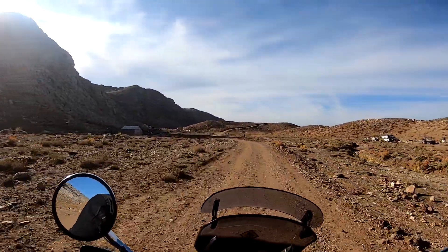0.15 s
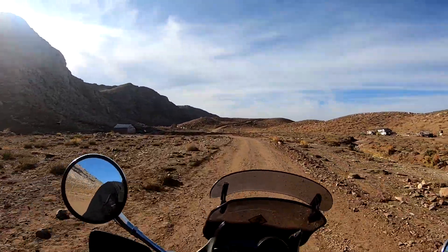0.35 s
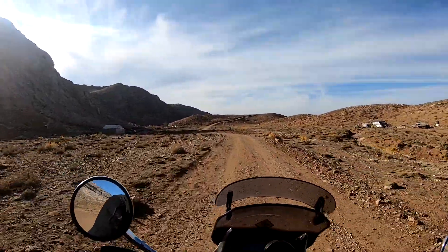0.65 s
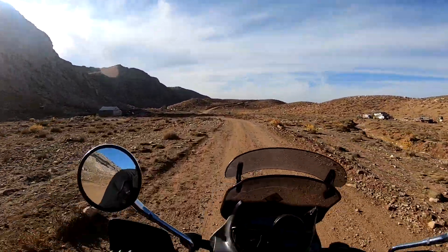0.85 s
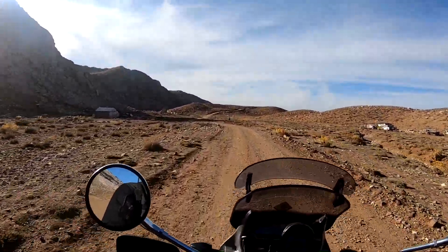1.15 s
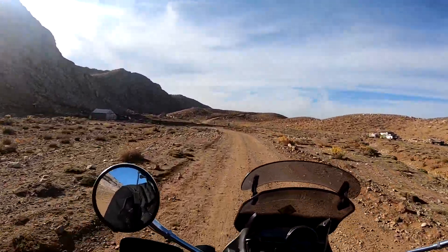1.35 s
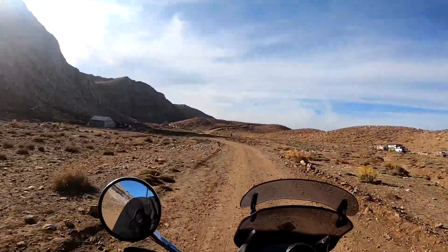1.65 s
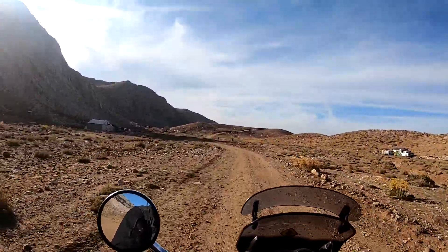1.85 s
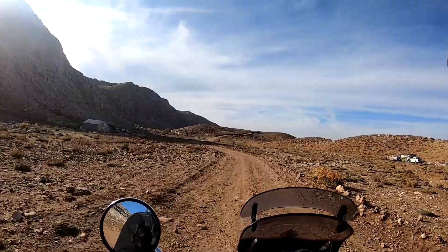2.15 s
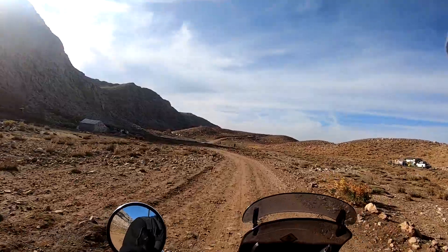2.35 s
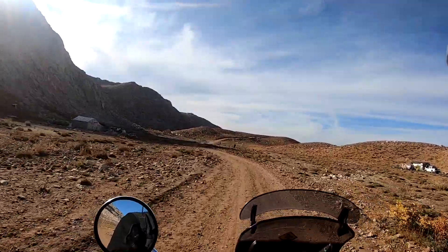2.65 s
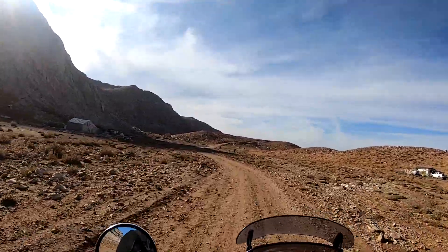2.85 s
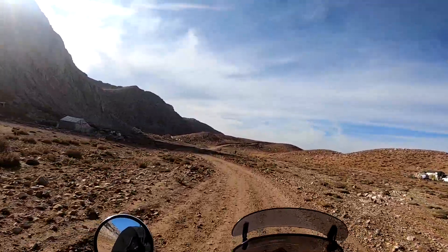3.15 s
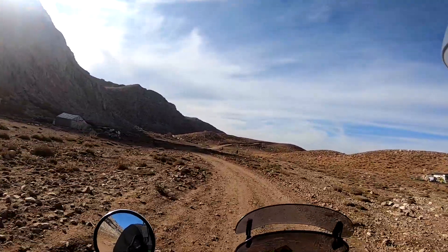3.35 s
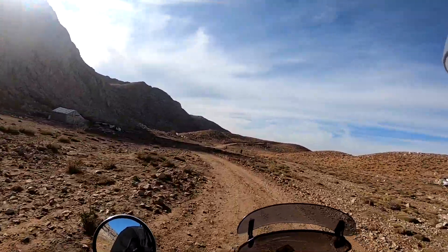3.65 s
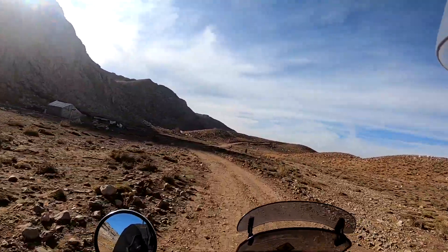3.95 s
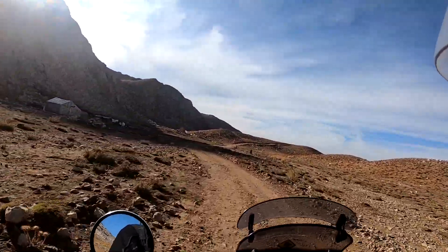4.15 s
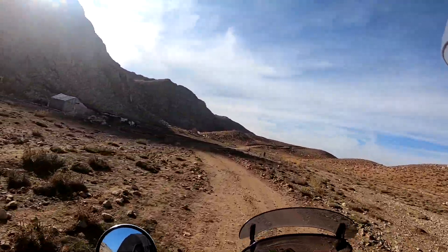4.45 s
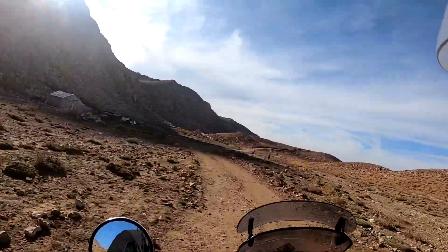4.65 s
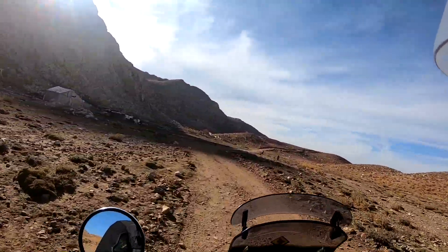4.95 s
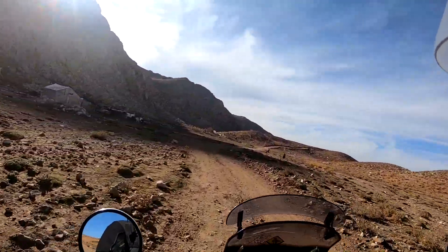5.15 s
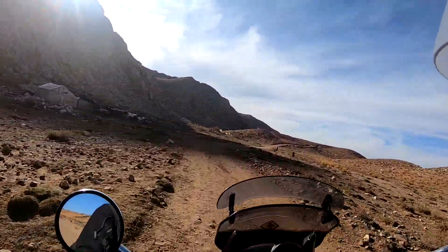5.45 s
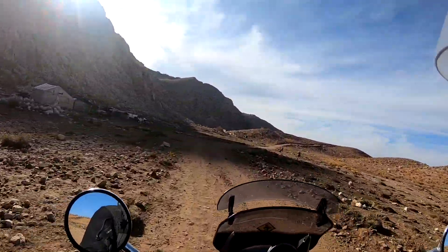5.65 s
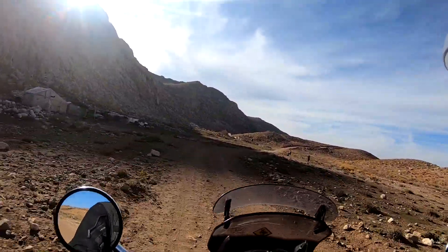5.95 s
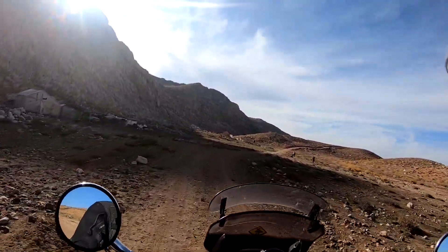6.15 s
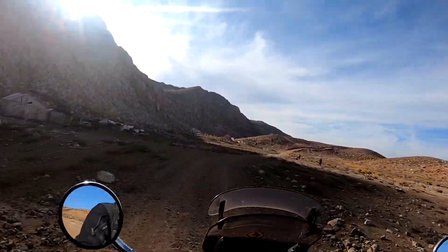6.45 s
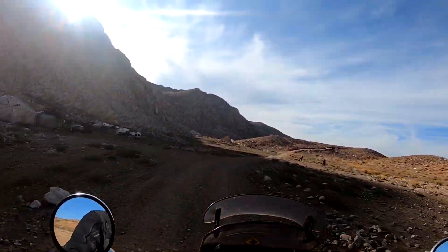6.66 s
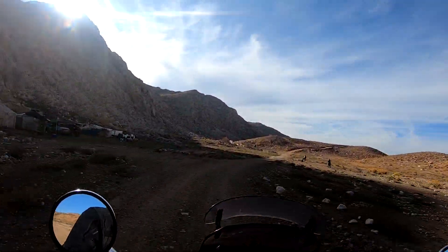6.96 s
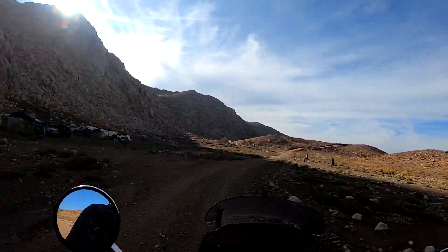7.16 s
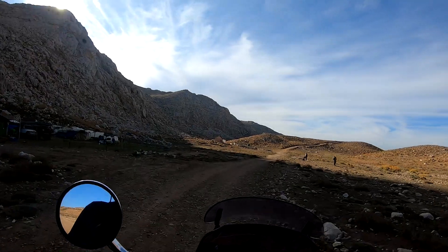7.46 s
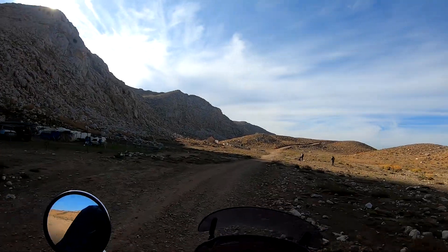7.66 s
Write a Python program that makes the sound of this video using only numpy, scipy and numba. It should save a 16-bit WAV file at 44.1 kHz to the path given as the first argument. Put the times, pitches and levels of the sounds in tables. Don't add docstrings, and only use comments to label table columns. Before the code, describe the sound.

A motorcycle drones low over a stony track, wind buffeting the microphone while knocks, clacks, rattles and gravel crackle come in irregular bursts.

```python
import sys
import numpy as np
from scipy import signal
from scipy.fft import rfft, irfft
from scipy.io import wavfile
from scipy.ndimage import uniform_filter1d
from numba import njit

SR = 44100
rng = np.random.default_rng(int(sys.argv[2]) if len(sys.argv) > 2 else 0)


def undo_db(level):
    steps = np.asarray(level, float) / 20
    return 10 ** steps


def dump_mix(stems):
    frames = np.atleast_2d(stems).T
    limited = np.clip(frames, -1, 1)
    pcm = np.round(limited * 32767).astype(np.int16)
    wavfile.write(sys.argv[1], SR, pcm)


N = 344421

# start in seconds, click in dB, thud in dB, upper click in dB.
THUMPS = [(0.065, -27, -22, -54), (0.2942, -27.5, -22.5, -44.5), (0.985, -41, -37, -39),
          (1.044, -21, -23, -36), (1.0957, -22, -24, -47.5), (1.145, -21.5, -25, -37),
          (1.3053, -26.5, -14.5, -61), (1.5133, -21.5, -20.5, -33), (1.6216, -22.5, -27, -47),
          (2.1257, -22, -27, -41), (2.252, -21, -20, -35), (2.9267, -10.5, -13, -39),
          (3.177, -23.5, -25, -38), (3.3006, -22.5, -18.5, -34), (3.8698, -24, -27, -45),
          (4.0314, -12, -25, -31.5), (4.1047, -25, -25, -32), (4.2657, -19.5, -30, -33.5),
          (4.5414, -12, -19, -35), (4.758, -25, -23.5, -50), (5.2848, -27, -13.5, -26),
          (5.367, -16, -27, -40), (5.6205, -20.5, -23, -49), (5.6936, -10, -10.5, -34),
          (5.8329, -12.5, -21.5, -38), (6.2897, -20, -27, -42), (6.7452, -13.5, -16, -24),
          (7.4332, -21.5, -40, -49), (7.5694, -17.5, -15.5, -43), (7.713, -17, -24.5, -44)]
CLACKS = [(1.1718, -26, -39, -59), (1.2896, -29, -38, -57), (1.5604, -17.5, -23, -45),
          (1.6604, -11.5, -16, -24.5), (1.7748, -12.5, -17.5, -28.5), (2.0742, -14, -18, -34),
          (2.601, -18, -25, -34.5), (3.106, -25.5, -42, -40.5), (3.308, -9, -30, -34),
          (3.501, -12.5, -16.5, -30), (3.5969, -14.5, -14, -22.5), (4.1492, -16.5, -20, -32),
          (4.4092, -15, -22, -39), (4.4662, -20, -23, -31), (4.6051, -20.5, -18.5, -34),
          (4.8196, -13.5, -25, -25), (4.8897, -18.5, -23, -46), (5.016, -11, -13, -26.5),
          (5.1222, -13.5, -19, -26.5), (5.2352, -8, -12, -21), (5.44, -10, -16, -21.5),
          (5.4983, -12.5, -16, -30), (6.8791, -8.5, -20, -31), (6.9382, -19.5, -24, -32.5),
          (6.98, -35, -45, -44), (7.0109, -22.5, -24, -36.5), (7.0211, -21, -33, -46),
          (7.1497, -26, -41, -60), (7.224, -28, -44, -52), (7.3243, -22.5, -34, -46)]
RATTLES = [(0.2339, -26, -44, -41), (0.4884, -30, -25, -45), (1.3875, -26, -31, -40),
           (1.6858, -27, -16, -29), (1.9365, -22, -22, -31), (2.8157, -27, -30, -36.5),
           (2.8467, -27, -34, -50), (2.999, -36, -35, -31), (3.01, -35, -42, -26), (3.017, -43, -33, -45),
           (3.3715, -12, -18, -20), (3.468, -21, -21.5, -33), (3.6271, -19, -20, -27),
           (3.938, -23, -21, -39), (4.125, -22, -22, -30.5), (4.4937, -23, -33, -37.5),
           (4.7682, -21, -25, -32.5), (5.1164, -16, -16, -33), (5.143, -20.5, -35, -32),
           (5.269, -25, -19, -48), (5.3115, -8.5, -15, -24), (5.542, -20, -19, -31),
           (5.5637, -21.5, -21, -45), (5.763, -19.5, -31, -40.5), (5.89, -36, -25, -26.5),
           (5.9652, -17.5, -21, -34), (6.099, -19.5, -28, -38), (6.1427, -23, -21, -29.5),
           (6.2686, -22.5, -23.5, -46.5), (6.299, -35, -38, -41), (6.4223, -18, -22, -31.5),
           (6.4623, -29, -29, -31.5), (6.8924, -39, -35, -38), (7.597, -26, -34, -27.5),
           (7.75, -24, -19, -40)]
STONES = [(0.0034, -14, -27, -53), (0.183, -24.5, -35, -64), (1.7004, -25, -25, -22.5),
          (1.7999, -28, -21, -27), (2.519, -21.5, -32, -54), (2.5537, -23, -34, -32.5),
          (2.6775, -27.5, -30, -39.5), (2.7932, -35, -32, -27), (2.8832, -24, -28, -27),
          (2.9044, -13.5, -16, -23.5), (2.986, -17.5, -30, -14), (3.054, -38, -27, -36),
          (3.2029, -34, -27, -51), (3.3249, -32, -30, -28.5), (3.3527, -20, -13, -21),
          (3.7276, -26.5, -31, -30), (3.9543, -13, -28, -33), (4.565, -30, -20, -29),
          (4.6199, -38, -33, -35), (4.806, -20, -26, -32), (4.8654, -38, -23, -25.5),
          (5.008, -33, -27, -34), (5.0333, -39, -45, -26), (5.2073, -38, -39, -41),
          (5.2284, -14, -25, -27.5), (5.4782, -26, -27, -24), (5.6492, -15.5, -28, -32.5),
          (5.7011, -9.5, -30, -24.5), (5.7477, -29, -29, -29), (5.8061, -16, -21, -23.5),
          (5.8642, -14, -31, -27.5), (5.9976, -36, -27, -38), (6.0201, -28, -21, -32),
          (6.0408, -19, -22, -18), (6.129, -24, -33, -34.5), (6.2005, -27, -38, -33),
          (6.445, -31, -34, -24), (6.527, -13.5, -20, -25), (6.5449, -28, -37, -25),
          (6.5706, -22, -43, -24.5), (6.6027, -32, -36, -29.5), (6.675, -41, -29, -24.5),
          (6.7922, -27, -33, -31.5), (6.817, -33, -38, -34), (6.9162, -36, -44, -38),
          (7.7692, -31, -40, -24.5)]
TICKS = [(0.1634, -32, -40, -54), (0.245, -26, -33, -55), (0.3203, -27, -27, -38.5),
         (0.3496, -35, -27, -52), (0.5378, -51, -39, -41.5), (0.627, -33, -38, -61),
         (0.6944, -29, -38, -57), (0.7143, -30, -31, -43), (0.7673, -30.5, -28, -54),
         (0.8769, -27, -23, -63), (0.942, -30, -33, -48), (0.993, -27, -31, -52), (1.0281, -25, -25, -46),
         (1.1953, -23, -38, -46), (1.232, -26, -38, -55), (1.331, -32, -34, -47), (1.4724, -28, -29, -58),
         (1.7681, -18, -49, -45), (1.8612, -29, -38, -54), (2.332, -38, -42, -42), (2.4267, -30, -42, -50),
         (2.4607, -29, -42, -48), (2.5004, -37, -34, -60), (2.564, -25, -32, -49), (2.802, -29, -25, -40),
         (2.9632, -25, -18, -45), (3.0605, -22, -21, -35), (3.4177, -27, -37, -44), (3.4487, -34, -32, -37),
         (3.6885, -38, -24, -44), (3.917, -28, -32, -49), (4.2236, -30, -29, -44), (4.675, -30, -44, -33.5),
         (4.9323, -25, -24, -55), (5.1708, -39, -38, -39), (5.7947, -20, -19.5, -29.5),
         (5.9448, -23, -33, -51), (6.2123, -28, -32, -58), (6.4973, -25, -26, -37),
         (6.6475, -22, -22.5, -41), (7.095, -34, -44, -55), (7.177, -29, -47, -52), (7.2637, -44, -49, -48),
         (7.3096, -42, -43, -51), (7.3753, -36, -47, -54), (7.5124, -30, -31, -39), (7.5601, -17, -31, -36)]
GRIT = [(1.003, -26, -36, -48), (1.344, -25.5, -34, -46), (1.642, -26, -33, -49), (1.714, -20, -32, -41),
        (1.757, -31, -35, -32), (1.834, -34, -30, -36), (4.167, -27, -32, -36), (2.110, -36, -20, -48),
        (2.407, -32, -40, -41), (2.632, -42, -44, -37), (4.159, -25, -32, -36), (3.399, -24, -30, -42),
        (3.611, -35, -34, -30), (3.642, -17, -23, -22.5), (4.037, -17, -19, -31), (4.050, -41, -35, -39),
        (4.117, -25, -22, -39), (4.374, -33, -32, -35), (4.399, -28, -30, -35), (4.474, -26, -24, -38),
        (4.588, -28, -23, -30), (4.63, -28, -39, -30.5), (4.833, -26, -19, -29), (4.882, -24, -34, -41),
        (5.430, -22, -28, -41), (5.340, -32, -40, -44), (5.380, -30, -22, -35), (5.906, -34, -34, -25),
        (6.049, -36, -26, -24.5), (6.063, -33, -33, -38), (6.105, -29, -29, -30), (5.638, -19, -32, -27.5),
        (7.624, -28, -40, -34), (7.654, -34, -38, -36), (7.727, -36, -32, -29), (7.736, -26, -31, -48),
        (7.793, -31, -25, -45.5)]


def on_time(table):
    s, *columns = np.transpose(table)
    return [np.interp(np.arange(N) / SR, s, c) for c in columns]


def level(x, db):
    return x * undo_db(db) / np.sqrt(np.mean(x ** 2))


def colour_db(points, hz):
    return np.interp(np.log(hz), np.log(np.array(points)[:, 0]), np.array(points)[:, 1])


def coloured(x, points):
    hz = np.maximum(np.fft.rfftfreq(N, 1 / SR), 1)
    return level(irfft(rfft(x) * undo_db(colour_db(points, hz)), N), 0)


def walk(rate):
    hold = int(SR / rate)
    steps = np.repeat(rng.standard_normal(N // hold + 1), hold)
    return 1.136 * uniform_filter1d(uniform_filter1d(steps, hold), hold)[:N]


def ring(x, hz, width_hz):
    return signal.lfilter(*signal.iirpeak(hz, hz / width_hz, fs=SR), x)


def high_pass(x, hz):
    return signal.sosfilt(signal.butter(2, hz, "high", fs=SR, output="sos"), x)


def band_pass(x, low_hz, high_hz):
    return signal.sosfilt(signal.butter(2, [low_hz, high_hz], "band", fs=SR, output="sos"), x)


@njit
def strike(start, hz, cycles, size, rise):
    out = np.zeros(N)
    for k in range(len(start)):
        swing = np.exp((2j * np.pi - 1 / cycles[k]) * hz[k] / SR)
        release = np.exp(-rise * hz[k] / SR)
        z, contact = size[k] + 0j, 1.
        for i in range(int(start[k]), min(N, int(start[k] + 7 * cycles[k] * SR / hz[k]))):
            out[i] += z.imag * (1 - contact) ** 2
            z, contact = z * swing, contact * release
    return out


def shaking():
    # time in seconds, steady shaking in dB.
    track = [(0, -59.5), (.9, -57), (1.05, -53), (1.7, -50.5), (2, -52), (2.7, -57), (3.1, -55),
             (3.55, -52), (3.8, -58.5), (4, -56), (4.7, -54.5), (5.4, -51.5), (6.2, -61), (6.4, -58),
             (6.9, -49.5), (7, -61), (7.45, -63.5), (7.55, -53)]
    # start in seconds, length in seconds.
    ripples = [(1.798, 0.17), (2.805, 0.064), (3.449, 0.11), (3.867, 0.13), (4.041, 0.15), (4.25, 0.043),
               (4.587, 0.073), (4.747, 0.037), (4.986, 0.072), (5.098, 0.14), (5.505, 0.17), (5.71, 0.076),
               (5.927, 0.25), (6.512, 0.081), (6.717, 0.062), (7.584, 0.064), (7.802, .03)]
    # start in seconds, length in seconds, shaking in dB.
    jolts = [(0, 0.0039, -30), (1.65, 0.062, -38), (2.067, 0.046, -43), (2.75, 0.032, -38),
             (2.789, 0.043, -35.5), (2.887, 0.12, -40), (2.979, 0.016, -21), (3.167, 0.044, -43),
             (3.295, .056, -38), (3.363, 0.021, -32.5), (3.588, 0.02, -29.5), (3.932, 0.045, -39),
             (4.04, 0.011, -52.5), (4.392, 0.03, -38), (4.528, 0.057, -40), (4.81, 0.056, -42),
             (5.225, 0.075, -39), (5.277, 0.053, -30), (5.427, 0.073, -38), (5.686, 0.033, -27.5),
             (5.797, 0.12, -37.5), (6.033, 0.022, -31), (6.254, 0.059, -42.5), (6.428, 0.052, -35.5),
             (6.637, 0.061, -43), (6.74, 0.023, -40), (6.874, 0.053, -39.5), (7.546, 0.06, -36),
             (7.709, 0.079, -40.5)]
    ripple_db, settle_db, settle_db_per_s = -46, -12.5, 281
    t = np.arange(N) / SR
    db, = on_time(track)
    for s, length in ripples:
        db = np.where((t >= s) & (t < s + length), np.maximum(db, ripple_db), db)
    for s, length, jolt_db in jolts:
        after = t - s - length
        settling = (after > 0) * (settle_db - settle_db_per_s * after)
        db = np.maximum(db, np.where(t < s, -99, jolt_db + settling))
    return uniform_filter1d(db, int(0.015 * SR))


def wind(shake_db):
    # time in seconds, wind pressure on the port in dB, turbulence in dB.
    gusts = [(0, -14.5, -26.5), (.5, -16.5, -30), (1, -16, -27.5), (1.5, -15.5, -26), (1.9, -17, -32.5),
             (2.25, -15, -25.5), (2.65, -14, -32.5), (2.95, -15.5, -29.5), (3.3, -16.5, -34.5),
             (3.75, -16.5, -30), (4.25, -16.5, -25), (4.58, -15, -26), (5.05, -17, -27.5),
             (5.28, -14, -27.5), (5.9, -19, -30.5), (6.5, -16, -27), (7.2, -18.5, -24), (7.81, -15, -32)]
    # frequency in Hz, density in dB per Hz.
    buffet_colour = [(3, -28), (12, -9), (20, 1), (27, -5), (36, -10), (50, -14), (70, -21), (250, -50),
                     (2000, -110)]
    rumble_colour = [(20, -20), (50, -4), (110, -6), (200, -11), (320, -19), (600, -32), (1500, -55),
                     (8000, -100)]
    gusty_db, rumble_per_shake = 0.5, 0.41
    gust_db, eddy_db = on_time(gusts)
    buffet = coloured(rng.standard_normal(N), buffet_colour)
    buffet = buffet / np.sqrt(uniform_filter1d(buffet ** 2, int(.14 * SR)))
    flicker_db = 3 * walk(35) + 2.5 * walk(12)
    rumble = coloured(rng.standard_normal(N), rumble_colour)
    gust_db = gust_db + gusty_db * walk(7.3)
    shaken_db = uniform_filter1d(shake_db, int(.08 * SR)) + 50.5
    rumble_db = eddy_db + rumble_per_shake * shaken_db
    return heaved(buffet * undo_db(gust_db + 2.0)) + rumble * undo_db(rumble_db + flicker_db)


def heaved(air):
    # time in seconds, depth in dB.
    heaves = [(1.664, -5), (3.501, -6), (3.597, -8.5), (4.545, -3), (4.756, -5), (5.009, -8), (5.441, -5.5),
              (5.69, -1), (6.424, -3), (6.731, -6), (6.88, -7), (7.562, -1.5), (7.716, -6.5)]
    half_width_s = .012
    t = np.arange(N) / SR
    for s, db in heaves:
        x = (t - s) / half_width_s
        bell = np.exp(-.5 * x ** 2)
        air = air * (1 - .8 * bell ** .5) - undo_db(db) * (1 - .6 * x ** 2) * bell
    return air


def engine():
    # time in seconds, engine cycles per second in Hz.
    revs = [(0, 24.3), (.17, 22), (.46, 17.3), (.55, 17), (.89, 18.9), (1.07, 19.5), (1.32, 21.1),
            (1.85, 23.5), (2.2, 24.9), (2.5, 25), (2.74, 24.7), (2.87, 23), (3.06, 18.9), (3.75, 18.4),
            (5, 17.4), (6.3, 16.8), (7.24, 17.2), (7.81, 17.6)]
    # time in seconds, level of order 4 in dB.
    drone_level = [(0, -23), (.15, -22), (.5, -22.5), (.9, -19.5), (1.4, -26), (1.9, -30.5), (2.6, -30),
                   (2.9, -26), (3.45, -25.5), (3.75, -29.5), (4.5, -25), (5, -27.5), (6, -27), (6.5, -24.5),
                   (6.95, -26), (7.1, -19.5), (7.4, -21), (7.81, -29)]
    # time in seconds, throttle in dB.
    throttle = [(0, -8), (.5, -8), (.75, -1), (1.0, 0), (1.25, -3), (1.55, -3), (1.85, 1), (2.05, 2),
                (2.2, 5), (2.35, 4), (2.47, -3), (2.75, -10), (5.8, -10), (6.3, -9), (7.2, -9), (7.81, -10)]
    # order of the cycle, level in dB against order 4, share of the throttle that it follows.
    drone = [(3, -19, 0.39), (4, -1, 0.058), (5, -10.5, 0.43), (6, -7.5, 0.7), (7, -20, 0.55),
             (8, -22, 0.43), (9, -14, 0.51), (10, -21, 0.48)]
    # frequency in Hz, width in Hz, level in dB.
    intake = [(525, 175, -37), (1130, 130, -49), (3100, 1200, -65)]
    pipe_hz, pipe_width_hz, pipe_db = 106.6, 17.6, 6.5

    (hz,), (drone_db,), (throttle_db,) = map(on_time, (revs, drone_level, throttle))
    turns = np.cumsum(hz) / SR + .7
    out = 0
    for order, db, share in drone:
        lift_db = pipe_db / (1 + ((order * hz - pipe_hz) / pipe_width_hz) ** 2)
        waver = undo_db(drone_db + db + lift_db + share * throttle_db + 1.3 * walk(7))
        phase = order * turns + rng.random() + .018 * walk(6)
        out = out + np.sqrt(2) * waver * np.sin(2 * np.pi * phase)
    gulps = np.diff(np.floor(turns), append=0) + .33 * np.diff(np.floor(turns + .625), append=0)
    gulps = np.maximum(gulps, 0) * undo_db(1.2 * rng.standard_normal(N))
    rasp = np.sin(np.pi * (turns % 1) ** .5) ** 2 * rng.standard_normal(N)
    breath = level(uniform_filter1d(gulps, 32), -8) + level(rasp, -3.5)
    airbox = sum(level(ring(ring(breath, f, w), f, w), db) for f, w, db in intake)
    return out + undo_db(throttle_db) * airbox


def knocks():
    # low bump in dB against the thud, bright tick in dB against the upper click,
    # loss at each rebound in dB.
    knock_colour = [
        (0, -18, 3.5),
        (-0.5, -27, 3),
        (-6, -10, 1.5),
        (-0.5, -18, 5),
        (-9, -14.5, 8.5),
        (-9, -13.5, 4.5),
    ]
    rise = 3.13
    lead_s, lead_db = 0.0026, -12
    blow_spread = .35

    kinds = zip((THUMPS, CLACKS, RATTLES, STONES, TICKS, GRIT), knock_colour)
    rows = [(*row, *colour) for table, colour in kinds for row in table]
    s, db, thud_db, upper_db, bump_db, tick_db, loss_db = np.transpose(rows)
    parts = [(114.7, 246, 0.81, thud_db + bump_db + 11.0),
             (245.5, 883, 0.62, thud_db + 13),
             (781, 1920, 0.68, db + 10.5),
             (2060, 4700, 0.72, upper_db + 17.5),
             (5300, 20000, 1.4, upper_db + tick_db + 11.5)]
    pick = rng.random((len(s), 5, len(parts), 2)).T
    out = 0
    for (lo_hz, hi_hz, cycles, part_db), tones, waits in zip(parts, *pick):
        for bounce, (tone, wait) in enumerate(zip(tones, waits), -1):
            gap_s = .0035 if bounce > 0 else lead_s
            late = .0008 * wait + gap_s * bounce * (.3 + wait)
            change_db = lead_db if bounce < 0 else -loss_db * bounce
            size = undo_db(part_db + change_db - (bounce != 0) * (2.5 + 12 * tone))
            pitch = tone if bounce else .45 + blow_spread * (tone - .5)
            hz = lo_hz * (hi_hz / lo_hz) ** pitch
            out = out + strike((s + late) * SR, hz, cycles * (1 + abs(bounce) * wait / 2), size, rise)
    return out


def crackle(shake_db):
    # frequency in Hz, density in dB per Hz.
    crackle_colour = [(88, -26), (160, -2), (280, -5), (410, -10), (630, -13), (1250, -17), (2500, -24),
                      (3700, -25), (5900, -36), (8400, -38), (15600, -53)]
    grains_per_s, spread_db, body_lag = 1800, 4, 0.35
    when, pitch, size, ringing = rng.random((int(grains_per_s * N / SR), 4)).T
    hz = 250 * 55 ** pitch
    cycles = .5 + 3.5 * ringing ** 3
    strength = hz / 1000 * undo_db(-spread_db * np.log(1 - .97 * size))
    grains = strike(when * N, hz, cycles, strength, 4.)
    rustle = rng.standard_normal(N) * undo_db(6 * walk(160))
    both = coloured(level(grains, -1) + level(rustle, -0.5), crackle_colour)
    top = high_pass(both, 5500)
    shine = undo_db(.16 * (shake_db + 43) + 2.5 * walk(30))
    body = band_pass(both, 250, 1300)
    dull = undo_db(-body_lag * np.maximum(shake_db + 24.5, 0))
    return (both + top * (shine - 1) + body * (dull - 1)) * undo_db(shake_db + 8.0)


def clunks():
    # start in seconds, pitch in Hz, peak level in dB.
    panel_notes = [
        (1.303, 810, -21),
        (1.303, 520, -26),
        (1.385, 480, -30),
        (3.374, 560, -18),
        (5.832, 900, -18),
        (6.040, 1900, -21),
        (6.461, 3000, -26),
        (6.676, 3000, -24),
    ]
    s, hz, db = np.transpose(panel_notes)
    return strike(s * SR, 1. * hz, np.full(len(s), 4.5), undo_db(db), 4.5)


def sizzle():
    buzz_db, t60_s, buzz_hz, width_hz = -14.5, .06, 3100, 2500
    s, _, _, upper_db = np.transpose(THUMPS + CLACKS + RATTLES + STONES + TICKS + GRIT)
    blows = np.bincount((s * SR).astype(int), undo_db(upper_db), N)
    fade = signal.lfilter([1], [1, -np.exp(-np.log(1000) / (t60_s * SR))], blows)
    buzz = ring(ring(rng.standard_normal(N), buzz_hz, width_hz), buzz_hz, width_hz)
    buzz = level(buzz * undo_db(4 * walk(300)), buzz_db)
    return uniform_filter1d(fade, int(.002 * SR)) * buzz


def road():
    # frequency in Hz, density in dB per Hz.
    road_colour = [(150, -25), (300, 0), (800, -6), (1250, -6), (1600, -18), (3200, -24), (7000, -41),
                   (15600, -55)]
    out, shared = 0, walk(55)
    for hz in 250 * 2. ** np.arange(6):
        band = band_pass(rng.standard_normal(N), hz, 2 * hz)
        out = out + band * undo_db(3.5 * shared + 3 * walk(60))
    return level(coloured(out, road_colour), -44)


def microphone_hiss():
    hiss = high_pass(rng.standard_normal(N), 6000)
    return level(hiss * undo_db(5 * walk(27)), -77)


def scene():
    shake_db = shaking()
    whole = wind(shake_db) + engine() + knocks() + crackle(shake_db) + clunks() + sizzle() + road()
    return (whole * np.minimum(np.arange(N) / (.004 * SR), 1))[None]


def low_pass(x):
    return signal.sosfilt(signal.butter(12, 15730, fs=SR, output="sos"), x)


def record(dry):
    headroom = 1.2
    dry = dry + microphone_hiss()
    rounded = headroom * np.tanh(dry / headroom)
    top_cut = signal.ellip(8, .2, 70, 15700, fs=SR, output="sos")
    return low_pass(signal.sosfilt(top_cut, rounded))


dry = scene()
out = record(dry)
dump_mix(out)
```